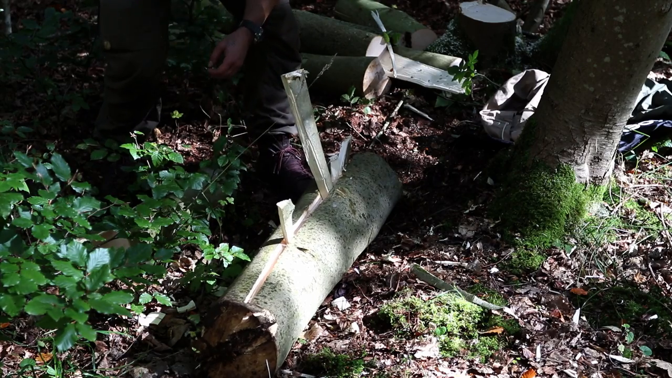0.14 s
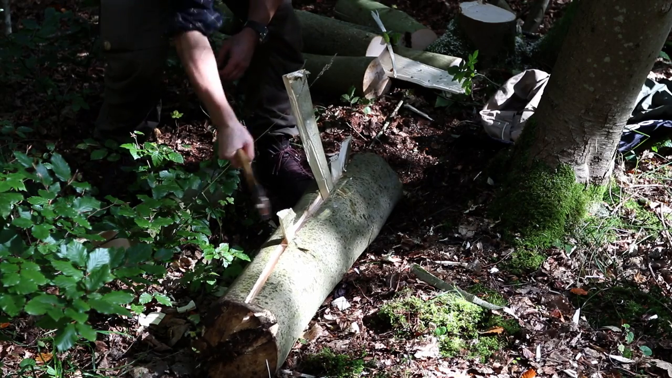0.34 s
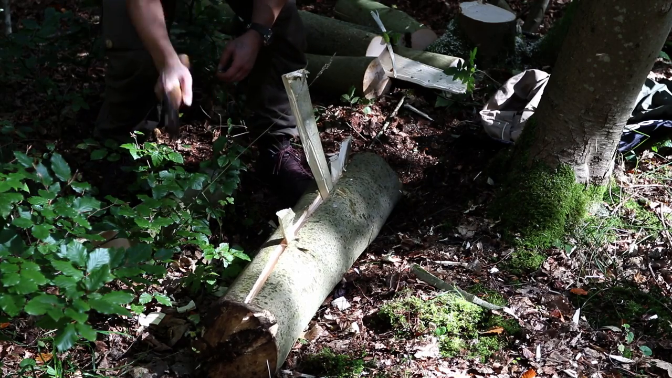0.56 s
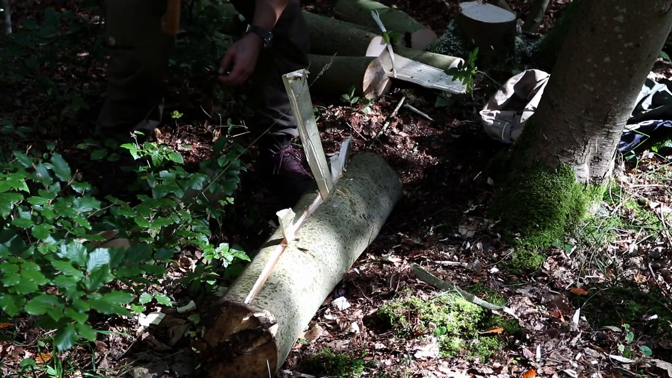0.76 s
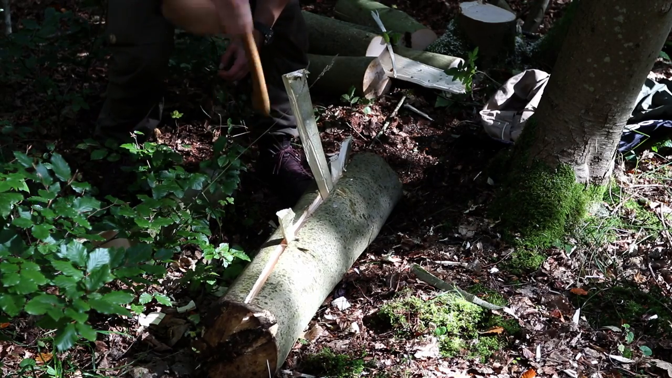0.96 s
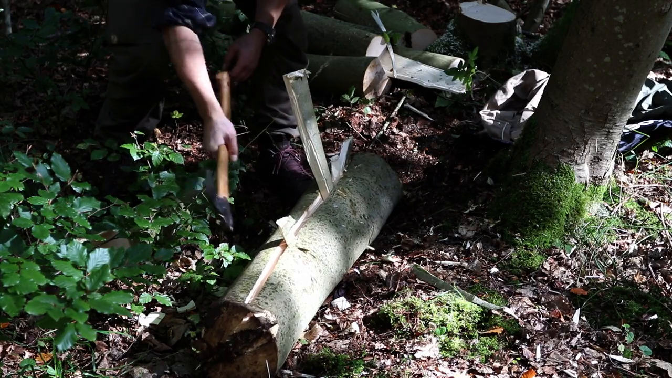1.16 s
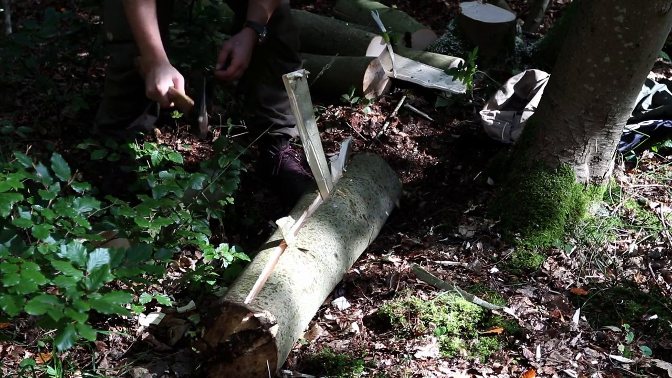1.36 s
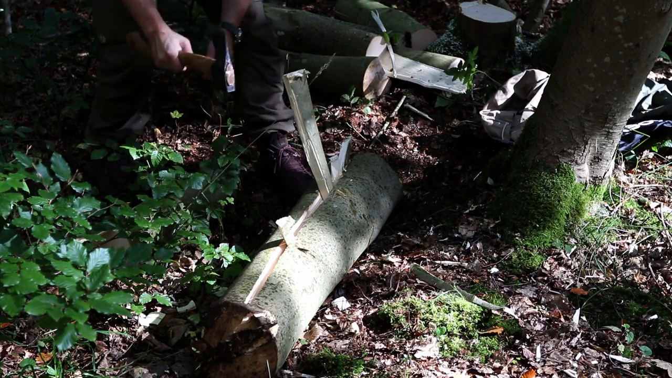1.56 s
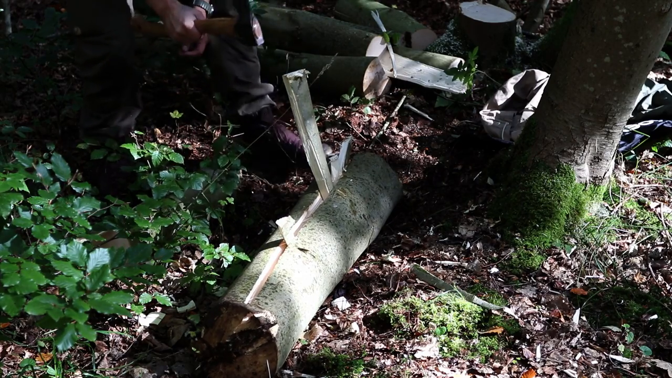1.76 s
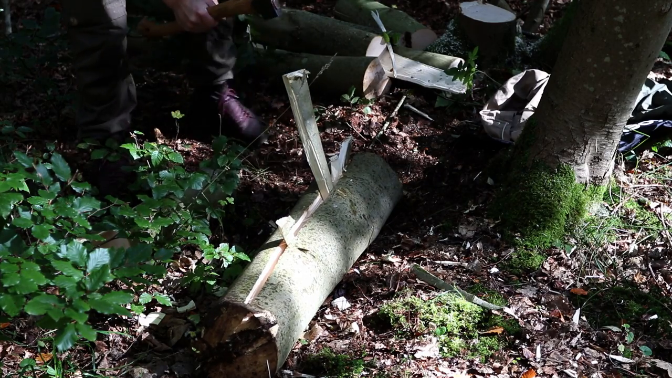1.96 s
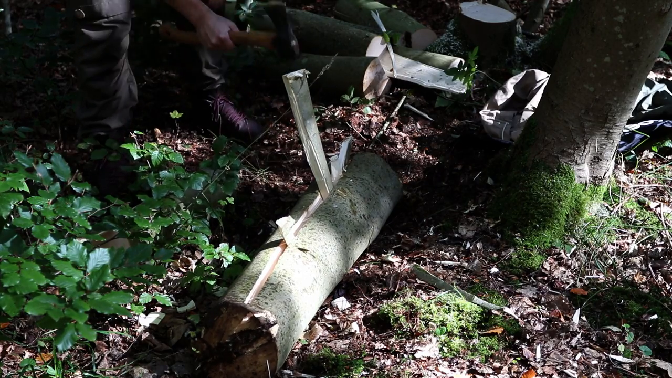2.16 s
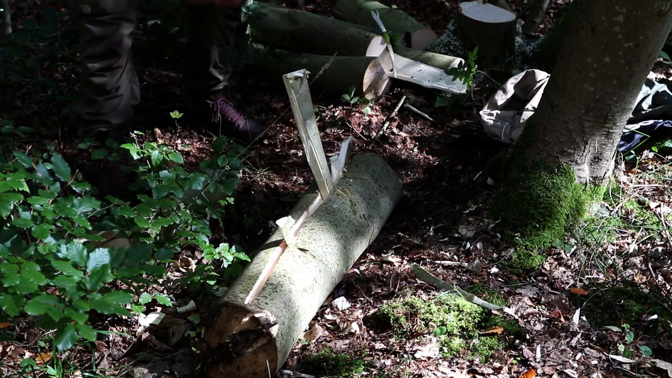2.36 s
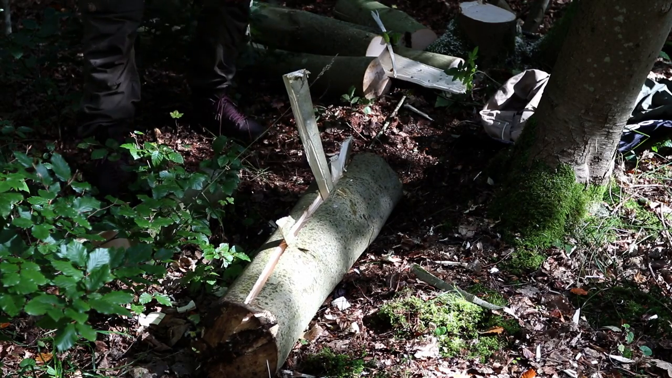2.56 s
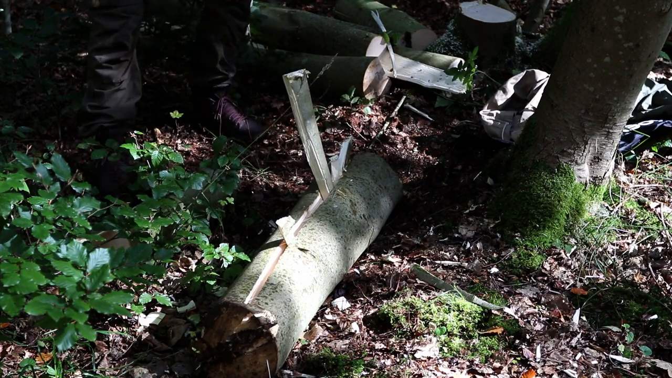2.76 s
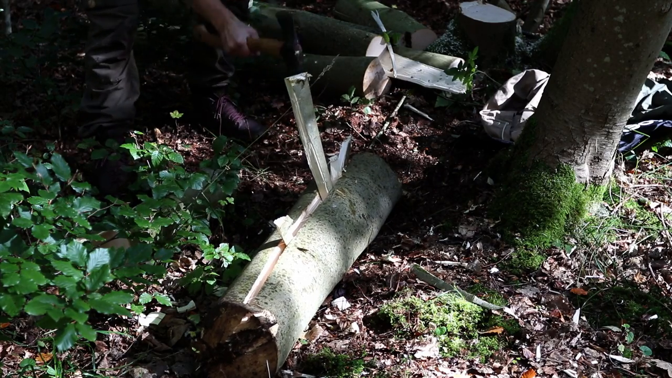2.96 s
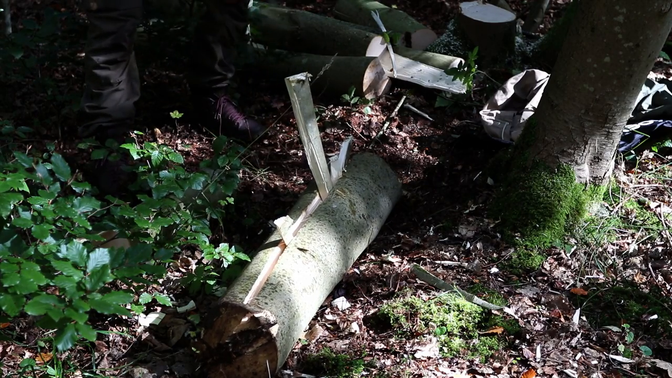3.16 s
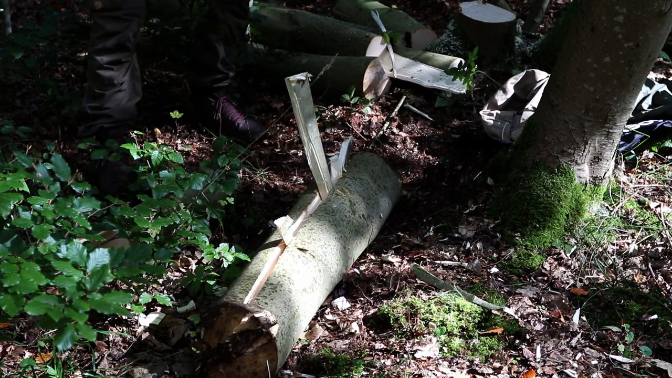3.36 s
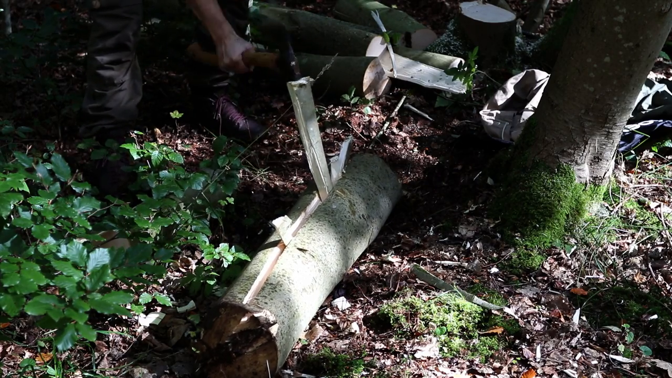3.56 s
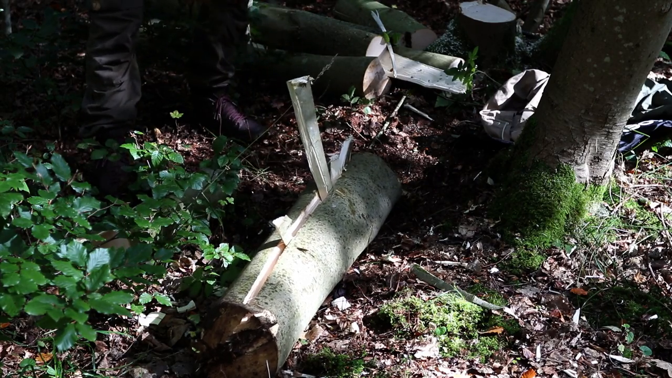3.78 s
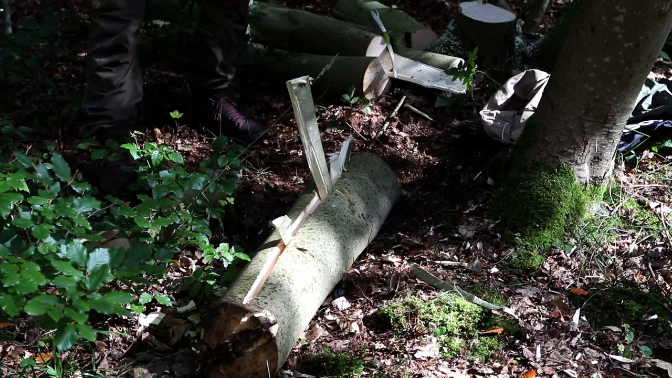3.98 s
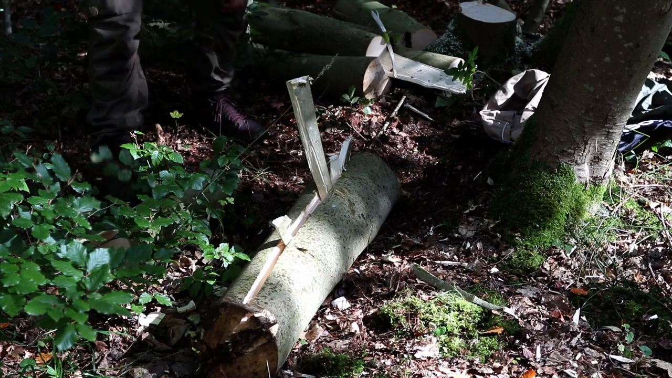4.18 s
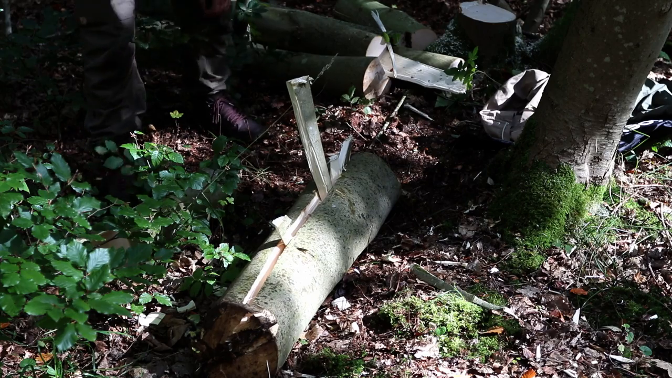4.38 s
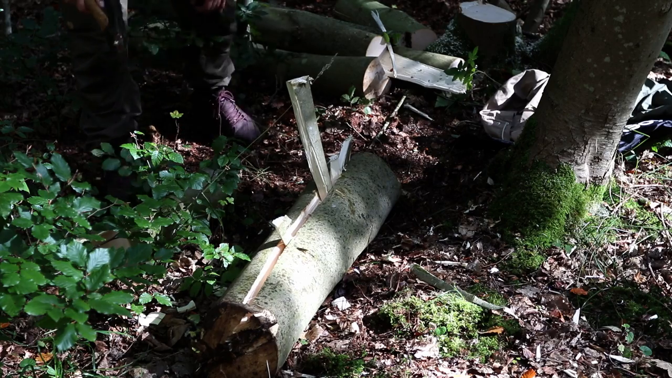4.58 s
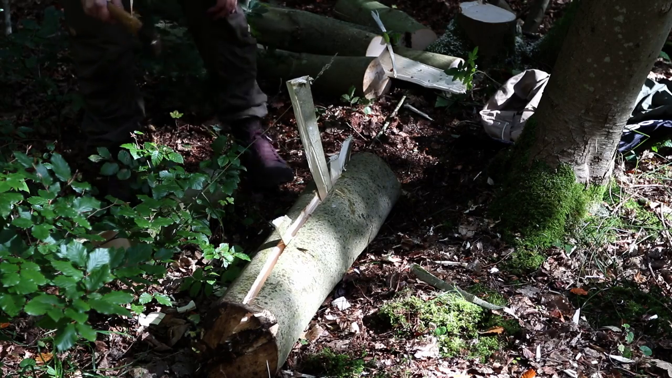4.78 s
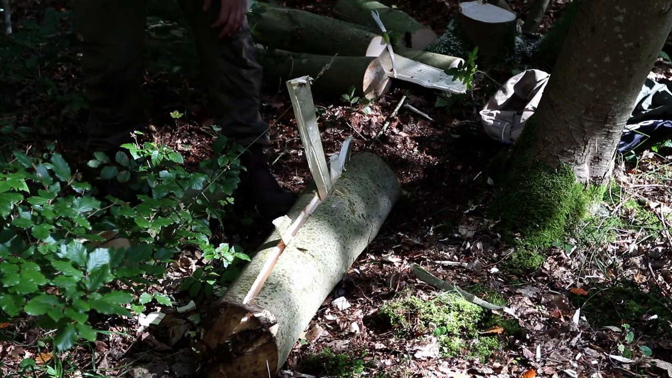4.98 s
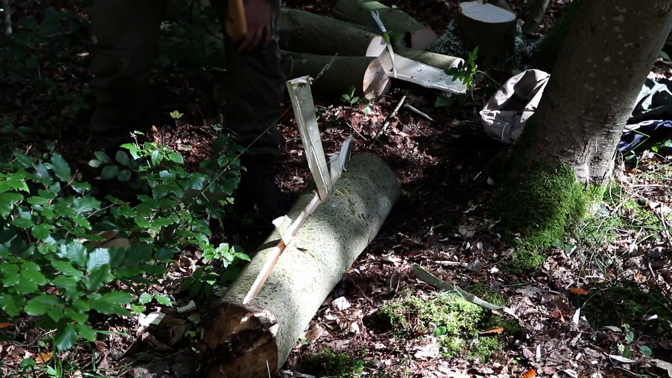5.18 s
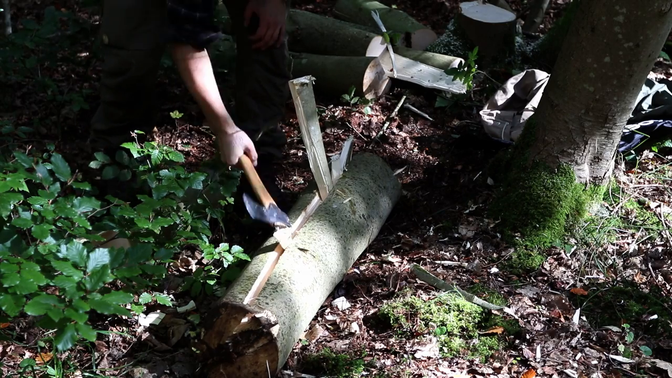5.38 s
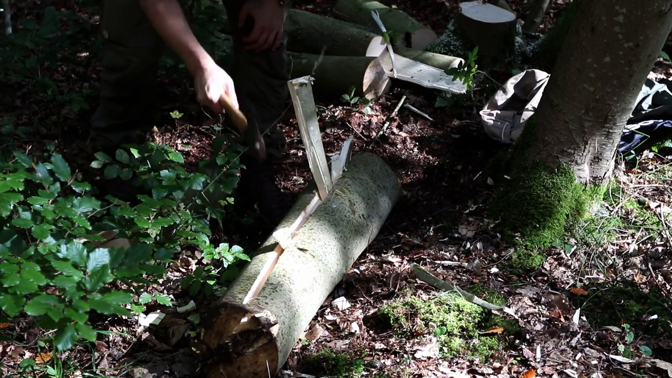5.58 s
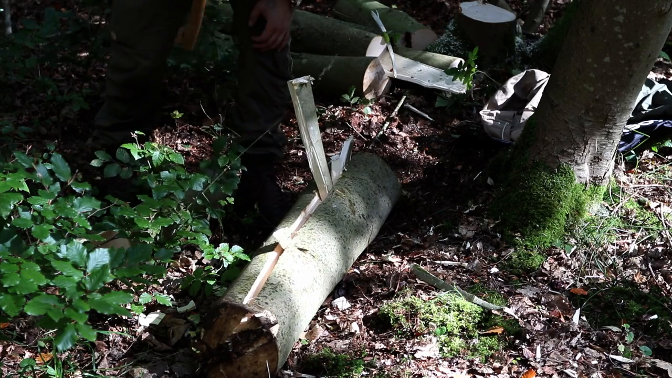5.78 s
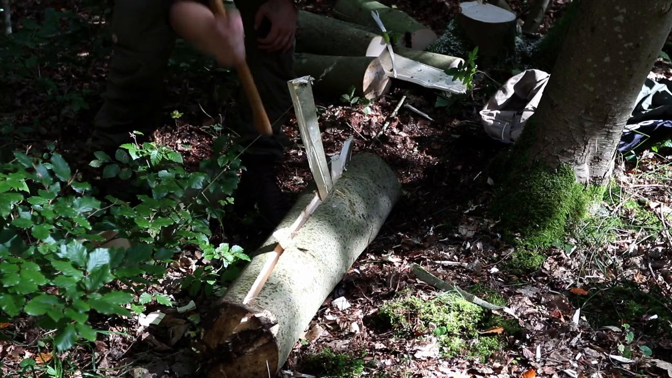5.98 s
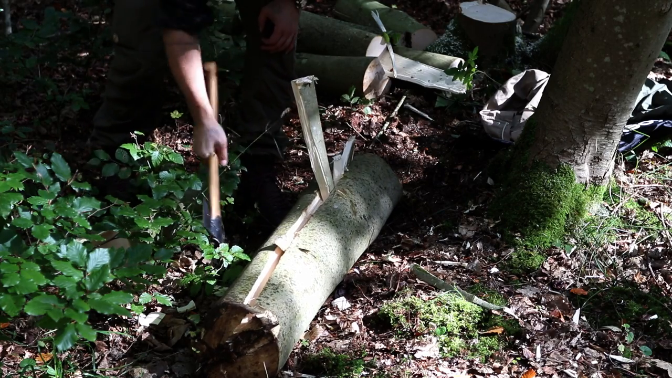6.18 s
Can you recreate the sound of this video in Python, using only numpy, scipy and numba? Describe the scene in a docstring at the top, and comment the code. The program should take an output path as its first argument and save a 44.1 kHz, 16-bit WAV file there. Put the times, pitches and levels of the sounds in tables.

```python
"""The back of an axe drives wooden wedges into a log on a forest floor, two metres from a microphone.
Each of six blows is a burst of crack noise over decaying wood modes, loud enough to overload the input;
scattering off the trunks returns it as a noise tail, and loose wood tumbles with the same modes driven
more weakly. Twigs tick as short noise bursts and leaves rustle as roughened noise underfoot, while two
wandering sines make a far engine hum under the slowly swelling coloured noise of the air."""
import sys
import numpy as np
from scipy import signal
from scipy.fft import rfft, irfft
from scipy.io import wavfile
from scipy.ndimage import uniform_filter1d
from numba import njit

SR = 44100
rng = np.random.default_rng(int(sys.argv[2]) if len(sys.argv) > 2 else 0)


def store_pcm(level_fs):
    """Save levels as 16-bit WAV."""
    pcm = np.round(np.clip(level_fs, -1, 1) * 32767).astype(np.int16)
    wavfile.write(sys.argv[1], SR, np.atleast_2d(pcm).T)


N = 275184


def undb(db):
    """Decibel definition: amplitude ratio of a level in dB."""
    return 10 ** (np.asarray(db) / 20)


def unit(x):
    """Normalisation to a root-mean-square value of 1."""
    return x / np.sqrt(np.mean(x ** 2))


def coloured(points, size=N, grain=1):
    """Spectral shaping: noise of rms 1 filtered to the given spectrum; grain roughens it first."""
    hz, db = np.transpose(points)
    log_hz = np.log(np.fft.rfftfreq(size, 1 / SR) + 1)
    gain = undb(np.interp(log_hz, np.log(hz), db))
    rough = rng.standard_normal(size) * grain
    return unit(irfft(rfft(rough) * gain, size))


def butter(x, order, hz, kind):
    """Butterworth filtering: a maximally flat passband."""
    return signal.sosfilt(signal.butter(order, hz, kind, fs=SR, output="sos"), x)


def band(x, hz, octaves):
    """Band-pass filtering: a constant relative bandwidth about the centre."""
    edges = [hz * 2 ** (-octaves / 2), min(hz * 2 ** (octaves / 2), .45 * SR)]
    return butter(x, 2, edges, "bandpass")


def fade(t, t60):
    """Exponential decay: the level falls 60 dB in t60."""
    return np.exp(-np.log(1000) * t / t60)


def add(out, s, sound):
    """Superposition: adds a sound starting at s seconds."""
    i = int(s * SR)
    out[i:i + len(sound)] += sound[:N - i]


def walk(rate):
    """Slow random modulation: levels held 1 / rate s, smoothed twice; spread near 1."""
    hold = int(SR / rate)
    levels = np.repeat(rng.standard_normal(N // hold + 1), hold)
    smooth = uniform_filter1d(uniform_filter1d(levels, hold), hold)
    return 1.35 * smooth[:N]


# spectrum of the air in the crowns, band-limited at 16 kHz: (frequency [Hz], relative density [dB per Hz])
AIR_SPECTRUM = [(15, -40), (30, -4), (50, 4), (110, 5.5), (190, 2.5), (300, 5.5), (600, 7.5), (1700, 0),
                (3200, -9), (5600, -8.5), (8500, -12), (10600, -17), (15700, -17), (16100, -54)]
AIR_DB = -47.5  # rms, about which the air swells


def air():
    """Broadband flow noise: air in the crowns, slowly swelling."""
    swell_db = .6 * walk(2.5)
    return coloured(AIR_SPECTRUM) * undb(AIR_DB + swell_db)


# partials of the far engine: (mean frequency [Hz], mean level [dB rms])
ENGINE_PARTIALS = [(73, -57), (146, -64)]


def engine():
    """Periodic source: harmonics share one wandering phase, and each level drifts on its own."""
    turns = np.cumsum(1 + 0.031 * walk(0.526)) / SR
    hum = np.zeros(N)
    for hz, db in ENGINE_PARTIALS:
        level = np.sqrt(2) * undb(db + 0.34 * walk(3.86))
        hum += level * np.sin(2 * np.pi * hz * turns)
    return hum


# feet shifting in the leaf litter; swell and dying times each span 20 dB:
# (time of the loudest moment [s], level [dB], swell [s], dying [s])
FOOT_SHUFFLES = [(0, -47, .1, 0.18), (1.15, -50, 0.033, 0.97), (1.74, -36, 0.1, 0.14),
                 (1.88, -45, 0.15, 0.3), (2.0, -45, 0.24, 0.39), (2.14, -37.5, 0.12, 0.27),
                 (2.33, -41, 0.19, 0.092), (2.5, -47.5, .12, 0.19), (2.9, -54.5, 0.47, 0.72),
                 (4.28, -45, 0.37, .5), (4.76, -38.5, 0.33, 0.2), (4.86, -35.5, 0.075, 0.28),
                 (5.0, -39, 0.22, 0.27), (5.1, -46, .1, 0.43), (5.24, -53, 0.31, 0.17),
                 (5.457, -40.5, .015, 0.11), (5.85, -50.5, 0.46, 0.3), (6.24, -47.5, 0.3, .1)]


def shuffling():
    """Energy summation: every shuffle swells, peaks and dies linearly in dB, and their powers add."""
    t = np.arange(N) / SR
    power = np.zeros(N)
    for s, db, swell, dying in FOOT_SHUFFLES:
        distance = np.where(t < s, (s - t) / swell, (t - s) / dying)
        power += undb(db - 20 * distance) ** 2
    return np.sqrt(power)


# spectrum of the leaf hiss, band-limited at 16 kHz: (frequency [Hz], relative density [dB per Hz])
LEAF_SPECTRUM = [(150, -6.5), (400, -3.5), (900, 1.5), (2500, -4.5), (4800, -6.5), (6400, -10), (8500, -4),
                 (10600, -18.5), (12800, -11.5), (15700, -20), (16100, -37)]


def rustle(feet):
    """Granular friction noise: crackles roughen the hiss; low, middle and high leaves flicker apart."""
    crackle = (rng.random(N) < 600 / SR) * undb(5.2 * rng.exponential(size=N))  # 600 per second
    smeared = signal.lfilter([1], [1, -.975], crackle)
    grain = .7 + .55 * unit(smeared)
    crunches = undb(1.74 * walk(35))
    hiss = coloured(LEAF_SPECTRUM, grain=grain * crunches)
    below_1800 = butter(hiss, 2, 1800, "lowpass")
    below_6000 = butter(hiss, 2, 6000, "lowpass")
    parts = (below_1800, below_6000 - below_1800, hiss - below_6000)
    return feet * sum(part * undb(1.2 * walk(20)) for part in parts)


# spectrum of breaking fibres, in ticks and in struck wood: (frequency [Hz], relative density [dB per Hz])
CRACK_SPECTRUM = [(90, -2), (300, 4.5), (1500, -3), (3000, -4.5), (5000, -12), (8200, -9), (10500, -20.5),
                  (13500, -15), (17000, -82.5)]
TICK_T60_S, PAT_DB = 0.017, -6


def snap(hz):
    """Impulsive fracture: a burst of noise around its own centre and 12.1 kHz, over a duller pat."""
    t = np.arange(SR // 20) / SR
    noise = coloured(CRACK_SPECTRUM, size=len(t))
    body = unit(band(noise, hz, 0.99))
    sparkle = .5 * unit(band(noise, 12100, 0.8))
    pat = undb(PAT_DB) * unit(band(noise, 1100, 2.0))
    return (body + sparkle + pat) * fade(t, TICK_T60_S)


# clear snaps of twigs and leaves, and the sharp crack of the knock at 2.19 s:
# (time [s], level [dB], centre [Hz])
CLEAR_TICKS = [(.089, -47, 8400), (0.324, -43, 8460), (0.3607, -33, 5500), (.595, -23.5, 7400),
               (0.707, -45, 9500), (.727, -43, 8400), (1.3031, -20.5, 3210), (1.504, -30, 3160),
               (1.614, -32.5, 8250), (1.6854, -21.5, 3420), (1.729, -34, 9470), (1.7636, -34, 8800),
               (1.8194, -36, 8300), (1.85, -27, 8400), (1.919, -30.5, 7700), (1.975, -41, 3000),
               (2.0576, -40, 5060), (2.1013, -35, 8560), (2.156, -35, 8500), (2.1918, -12.5, 6960),
               (2.219, -25, 7950), (2.4997, -38, 8840), (2.6992, -38, 5890), (2.7552, -34.5, 7200),
               (3.6237, -42.5, 4880), (3.9637, -37, 3740), (4.374, -37, 6800), (4.397, -39, 3750),
               (4.7186, -37, 8900), (4.9473, -30.5, 9000), (4.988, -31, 6860), (5.1077, -36, 8070),
               (5.14, -36.5, 8650), (5.2727, -43, 4450), (5.4516, -35.5, 4900), (5.511, -25, 2960),
               (5.601, -43, 9500), (5.656, -37, 9000), (5.7943, -35.5, 8100), (5.8633, -38.5, 8100),
               (6.0568, -36, 8600), (6.1915, -35, 3030)]
FAINT_TICKS_PER_S, FAINT_TICK_DB = 60, -4  # chance ticks; median level against the feet


def ticks(feet):
    """Random impulse train: clear snaps, and fainter chance ones whose level follows the feet."""
    out = np.zeros(N)
    for s, db, hz in CLEAR_TICKS:
        add(out, s, undb(db) * snap(hz))
    scatter_db = 2.5 * rng.standard_normal(N)
    chance = rng.random(N) < FAINT_TICKS_PER_S / SR
    pulses = chance * undb(FAINT_TICK_DB + scatter_db) * feet
    kind = rng.integers(3, size=N)
    for k, hz in enumerate((3500, 5500, 8500)):
        out += signal.fftconvolve(pulses * (kind == k), snap(hz))[:N]
    return out


# modes of log and wedges; shape 1 rings freely, above 1 holds while the axe presses and is then choked,
# below 1 drops at once and lingers: (frequency [Hz], fade time before the strike's length factor [s], shape)
WOOD_MODES = [(501, 0.034, 1.16), (306.6, 0.049, 0.74), (418, .17, 1.0), (580, .19, 1.0),
              (670.7, 0.028, 1.33), (976.5, 0.034, 1.1), (1254.4, 0.019, 1.98), (1509, 0.021, 1.54),
              (1812, 0.026, 0.72), (2256, 0.013, 1.8), (2770, 0.017, 1.44), (4140, 0.029, 0.48)]
CRACK_FADE_S, CRACK_HOLD = 0.015, 2.5  # the crack holds, then is choked
CONTACT_S, FAR_RING_T60_S = 0.00029, .025


def strikes(rows, drive_db, low_lag_cycles, splinter_db, far_crack_db, thin_hz):
    """Modal excitation: contact cracks, fibres tear after it, and low modes take longer to swing up.
    Row 0 is the sound close by; out to the trunks go row 1, the first swings of the middle modes,
    and row 2, the crack as one pulse."""
    out, t = np.zeros((3, N)), np.arange(SR // 3) / SR
    hz, fade_s, shape = np.transpose(WOOD_MODES)[:, :, None]
    middle = (hz[:, 0] > 900) & (hz[:, 0] < 2000)
    contact = np.minimum(t / CONTACT_S, 1)
    for s, length, crack_db, knock_db, centre_hz, fall_db, *log_db in rows:
        # the spot that is hit drives the modes near its own pitch hardest
        octaves_off = abs(np.log2(hz[:, 0] / centre_hz))
        mode_db = knock_db + np.array(drive_db) - fall_db * octaves_off
        mode_db[2:4] = log_db  # the two long rings of the log itself

        chance = rng.standard_normal((len(WOOD_MODES), 2))
        detuned_hz = hz * (1 + .003 * chance[:, :1])
        swing = np.sign(chance[:, 1:]) * np.sin(2 * np.pi * detuned_hz * t)
        rise = 1 - np.exp(-t * hz / low_lag_cycles)
        decay = fade((t / (length * fade_s)) ** shape, 0.91)
        modes = undb(mode_db)[:, None] * swing * rise ** 2 * decay

        splinter = undb(splinter_db) * fade(t, 0.035)
        crack_level = fade((t / CRACK_FADE_S) ** CRACK_HOLD, 0.77) + splinter
        crack = crack_level * butter(coloured(CRACK_SPECTRUM, size=len(t)), 2, thin_hz, "highpass")
        # the ring of blows and knocks is kept free of deep bass
        ring = butter(modes.sum(axis=0), 2, 170, "highpass")
        add(out[0], s, ring * contact + undb(crack_db) * crack * contact ** 2)
        add(out[1], s, modes[middle].sum(axis=0) * fade(t, FAR_RING_T60_S))
        add(out[2], s, undb(crack_db + far_crack_db) * (t == 0))
    return out


# blows of the axe: (time [s], factor on fade times, crack [dB], knock before drive and fall-off [dB],
# knock centre [Hz], fall-off [dB per octave], low log ring [dB], high log ring [dB])
AXE_BLOWS = [(.4813, 0.96, -2, 6.8, 2170, 4.4, -17.5, -4), (1.2017, 0.95, -0.55, 9.9, 1800, 5.5, -10.5, -2),
             (3.022, 0.67, 3, 22.2, 1605, 13.8, -4, -12), (3.7075, 0.73, 2.5, 22.8, 1650, 11.7, -10, -9),
             (5.4888, 0.7, -4.5, 20.5, 1288, 19.3, -11, -15), (6.2198, 0.58, -5, 19.6, 1646, 12.1, -9.5, 0)]
# how readily each wood mode answers the axe: one value per mode (drive [dB])
AXE_DRIVE = [6, 9, 0, 0, 5.5, -2.5, -5.5, -4.5, 9, -6.5, -1, 11]


def axe_blows():
    """Forced impact: the axe drives the wedge and log modes hard, with a full-bodied crack."""
    return strikes(AXE_BLOWS, AXE_DRIVE, 0.67, -2, 23.8, thin_hz=59.4)


# scatter off the trunks by band: (centre [Hz], relative level [dB], t60 once past the full answer [s])
TRUNK_BANDS = [(250, -63, 1.8), (546, -47, 0.78), (876, -47, 1.18), (1760, -45, 1.12), (2690, -43, 0.66),
               (4380, -43.5, 0.71), (6900, -46.5, 0.52), (11400, -61, 0.43)]
TRUNKS_RISE_S, TRUNKS_FULL_S = 0.0025, 0.12  # most trunks answer until the second time
# ground and nearest trunks answer first, unevenly
NEAR_ECHO_DB, NEAR_ECHO_T60_S, ECHOES_PER_S = 14.5, 0.11, 700


def trunks(x, db):
    """Multiple scattering: uneven near echoes, then a dense answer from ring after ring of trunks
    that holds before it dies at its own rate in each band."""
    t = np.arange(int(1.2 * SR)) / SR
    late = np.maximum(t - TRUNKS_FULL_S, 0)
    pulses = (rng.random(len(t)) < ECHOES_PER_S / SR) * rng.exponential(size=len(t))
    single = uniform_filter1d(pulses, size=110)
    grain = 1 + undb(NEAR_ECHO_DB) * unit(single) * fade(t, NEAR_ECHO_T60_S)
    answer = np.zeros(len(t))
    for hz, band_db, t60 in TRUNK_BANDS:
        noise = unit(band(rng.standard_normal(len(t)), hz, 0.75))
        answer += undb(band_db) * noise * grain * fade(late, t60)
    rise = 1 - np.exp(-t / TRUNKS_RISE_S)
    return signal.fftconvolve(x, answer * rise * undb(db))[:N]


# loose wood knocking on log and ground: (time [s], factor on fade times, crack [dB],
# knock before drive and fall-off [dB], knock centre [Hz], fall-off [dB per octave],
# low log ring [dB], high log ring [dB])
LOOSE_KNOCKS = [(1.6945, 0.61, -21, -3.5, 1120, 11.3, -9.5, -24),
                (1.7105, 0.32, -26, -14, 1350, 8.8, -22, -28),
                (1.8552, .99, -24.5, -15.5, 1630, 8.7, -41, -38),
                (2.0368, 0.92, -29, -26, 1500, 22, -38.5, -41),
                (2.1925, 0.93, -39, -21.5, 1750, 6.4, -24.5, -37),
                (2.3275, 0.59, -43, -24, 1390, 10, -49, -35),
                (2.3426, 0.98, -29.5, -17.5, 754, 12, -34.5, -29.5),
                (2.468, 0.51, -44, -26, 1490, 9.1, -59, -46), (4.152, 0.41, -35.5, -23, 1420, 21, -35, -57),
                (5.204, 0.11, -58, -31, 330, 22, -18, -30)]
# how readily each wood mode answers loose wood: one value per mode (drive [dB])
LOOSE_DRIVE = [-25, -5, 0, 0, 4.5, -5, -8.5, -5, 3.5, -11, -29, -4]


def loose_wood():
    """Free impact: a tumbling piece drives the same modes more weakly, with a thinner crack."""
    return strikes(LOOSE_KNOCKS, LOOSE_DRIVE, 0.52, -4, 19, thin_hz=875)


def scene():
    """Superposition of direct sound, scattered sound and the sounds of the forest floor and air."""
    near, rings, cracks = axe_blows() + loose_wood()
    feet = shuffling()
    scattered = trunks(rings, -34.0) + trunks(cracks, -20.5)
    floor = ticks(feet) + rustle(feet)
    return (near + scattered + floor + air() + engine())[None]


@njit
def follow(x, attack, release):
    """Envelope detection: a level follower, quick up and slow down."""
    e, out = 0., np.empty(len(x))
    for i in range(len(x)):
        e += (abs(x[i]) - e) * (attack if abs(x[i]) > e else release)
        out[i] = e
    return out


def record(dry):
    """Compression and overload: levels above -28 dB are eased down, peaks clip flat, both ends are cut."""
    envelope = follow(np.clip(dry[0], -1, 1), 1 / (.012 * SR), 1 / (.055 * SR))  # 12 ms up, 55 ms down
    gain = np.minimum(1, (undb(-28) / (envelope + 1e-9)) ** .2)
    clipped = np.clip(dry * gain, -1, 1)
    wet = butter(clipped, 1, 20, "highpass")
    top_cut = signal.ellip(8, .2, 50, 16800, fs=SR, output="sos")
    return signal.sosfilt(top_cut, wet)


dry = scene()
out = record(dry)
store_pcm(out)
```